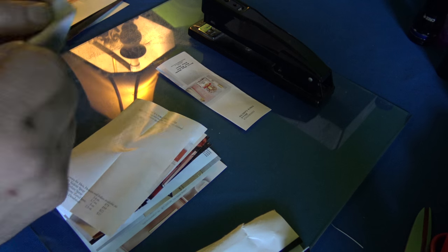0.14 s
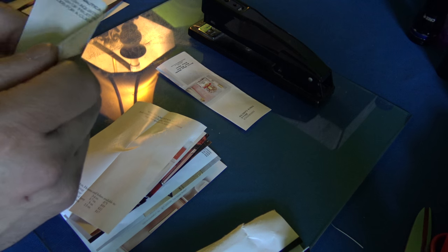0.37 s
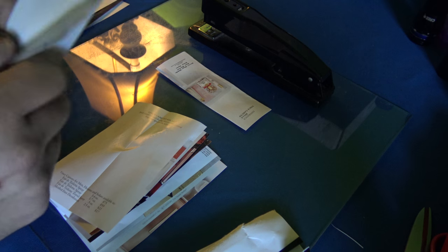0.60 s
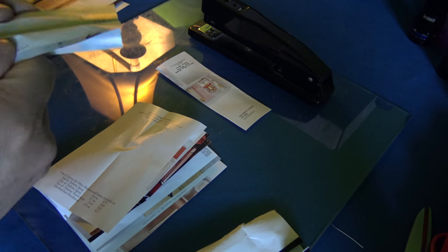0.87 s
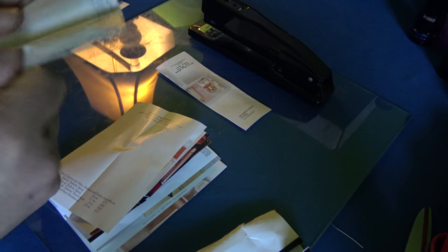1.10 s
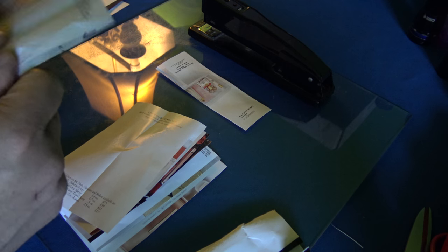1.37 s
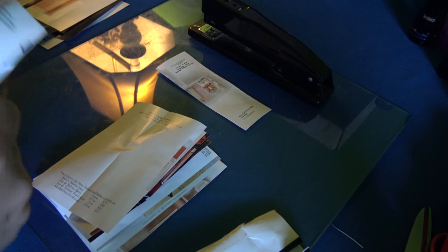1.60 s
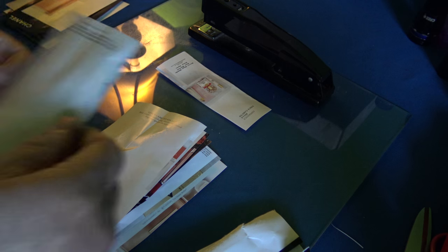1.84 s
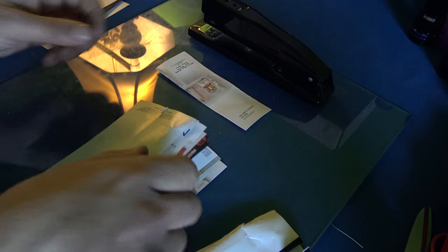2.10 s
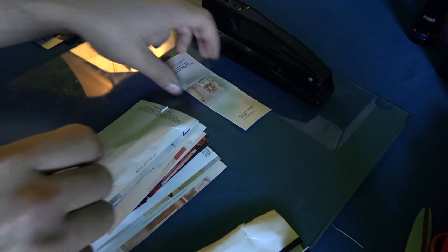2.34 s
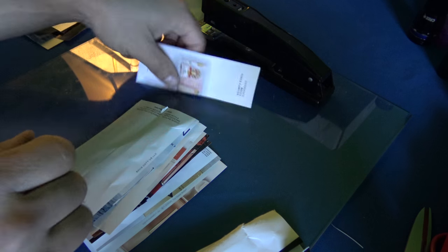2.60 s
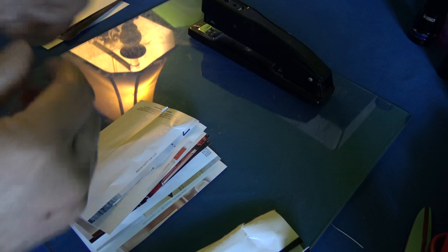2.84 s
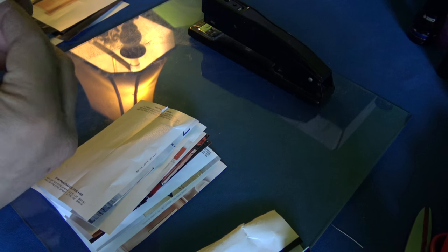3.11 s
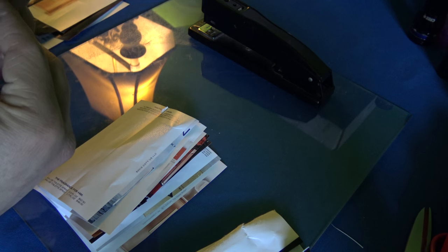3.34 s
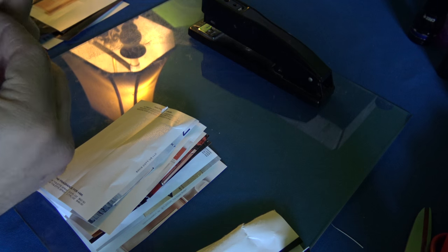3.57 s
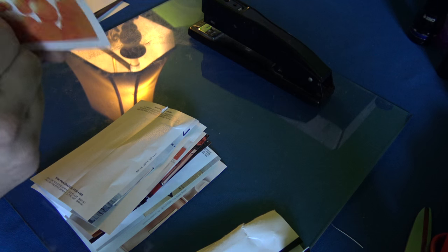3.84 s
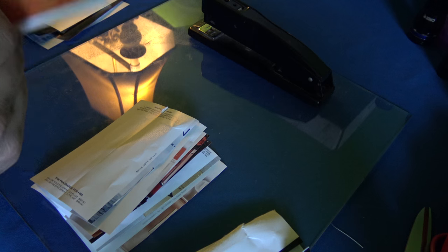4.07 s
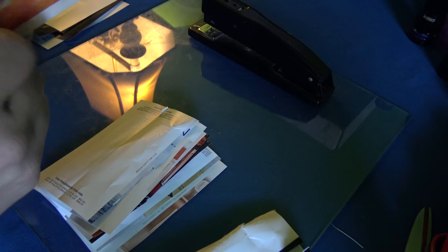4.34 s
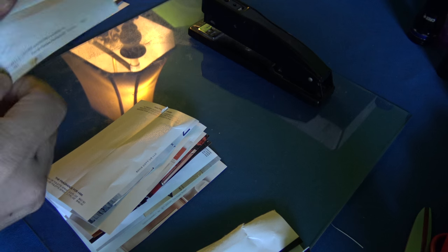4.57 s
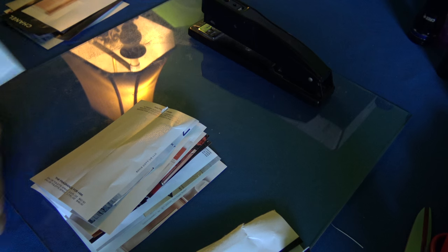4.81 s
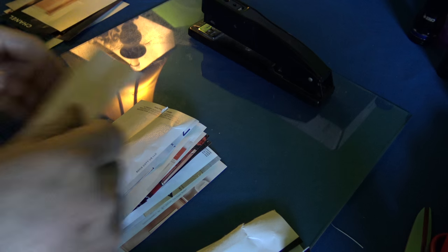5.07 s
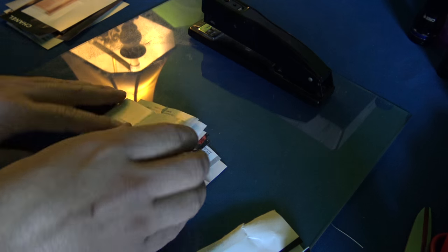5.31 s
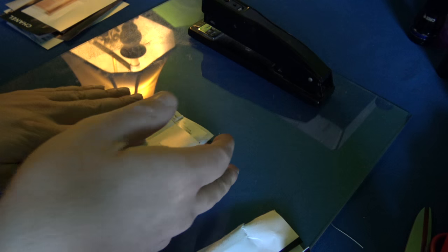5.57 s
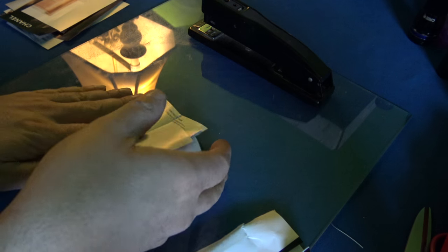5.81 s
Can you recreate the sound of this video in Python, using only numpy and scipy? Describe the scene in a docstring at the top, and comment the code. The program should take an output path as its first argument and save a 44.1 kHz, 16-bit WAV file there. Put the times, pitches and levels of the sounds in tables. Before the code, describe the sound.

Close, dry paper rustling and sharp crackling snaps in bursts, with quieter pauses, faint desk thumps and a low steady room drone.

```python
"""Paper rustles in dense crackles and snaps, an edge squeaks and fingers thump a desk top.
Hands crumple, fold and stack small paper strips close to two microphone ports.
Crackles and snaps are filtered noise bursts, squeaks are fuzzy gliding tones, thumps are ringing desk modes.
A small room answers the paper, a low drone fills the pauses, and the loudest snaps stand above the rustle."""
import sys
import numpy as np
from scipy import signal
from scipy.fft import rfft, irfft, next_fast_len
from scipy.io import wavfile
from scipy.ndimage import uniform_filter1d

SR = 44100
rng = np.random.default_rng(int(sys.argv[2]) if len(sys.argv) > 2 else 0)


def undo_db(level):
    """Turn decibels back into plain size, where 20 dB means ten times bigger."""
    steps = np.asarray(level, float) / 20
    return 10 ** steps


def generate_wav(sig):
    """Save sig (samples, or channels by samples) to the path in sys.argv[1] as 16-bit PCM at SR."""
    pcm = np.round(np.clip(np.atleast_2d(sig).T, -1, 1) * 32767).astype(np.int16)
    wavfile.write(sys.argv[1], SR, pcm)


N = 261513  # length in samples

# Centres of the octave-wide bands that build up the paper sounds: one column (frequency [Hz])
BAND_CENTRES_HZ = np.array([280, 560, 1100, 2100, 4000, 8000, 13000])


def unit(x):
    """Scale to rms 1."""
    return x / np.sqrt(np.mean(x ** 2, axis=-1, keepdims=True) + 1e-20)


def along(points, hz, column=1):
    """Read a column of a table between its frequency points, on a log axis."""
    table = np.transpose(points)
    return np.interp(np.log(hz + 1), np.log(table[0] + 1), table[column])


def filtered(x, response):
    """Shape the spectrum of x by a response that depends on frequency."""
    m = next_fast_len(N + 8192)
    spectrum = rfft(x, m)
    return irfft(spectrum * response(np.fft.rfftfreq(m, 1 / SR)), m)[..., :N]


def patchy(patchy_db):
    """White noise whose colour drifts in patches of time and frequency."""
    z = signal.stft(rng.standard_normal(N), nperseg=256)[2]
    field = uniform_filter1d(rng.standard_normal(z.shape), size=4, axis=0)
    field = uniform_filter1d(field, size=6, axis=1)
    coloured = z * undo_db(patchy_db * field / field.std())
    return unit(signal.istft(coloured, nperseg=256)[1][:N])


def fade(hz, t60, length=2048):
    """A sudden start dying away, slower in low octaves; t60 (seconds to fall 60 dB) holds at 3 kHz."""
    seconds = np.arange(length) / SR
    return undo_db(-60 * seconds / (t60 * (3000 / hz) ** 0.09))


def octave(x, hz):
    """Keep one octave of x around hz, using only its past."""
    edges = [hz / np.sqrt(2), min(hz * np.sqrt(2), SR / 2 - 100)]
    return signal.sosfilt(signal.butter(3, edges, "band", fs=SR, output="sos"), x)


def shares(tilt_db, bend_db):
    """How the energy divides over the octaves: big folds speak low, crease tips high."""
    octaves_up = np.log2(BAND_CENTRES_HZ / 3000)[:, None]
    gains = undo_db(tilt_db * octaves_up - bend_db * octaves_up ** 2)
    return gains / np.linalg.norm(gains, axis=0)


def drone(unlike_db=-14):
    """Steady rumble lifted at the room's low resonances, and hiss, nearly alike at both microphones."""
    # room resonances: (frequency [Hz], half width [Hz], strength of the added peak [dB])
    resonances = [(61.6, 1.7, 12.5), (142, 18, 2.5), (273, 27, 0.5),]
    # colour of the drone: (frequency [Hz], relative level [dB])
    drone_colour = [(25, -13.5), (45, -5.5), (95, -5), (430, -4), (520, -9.5), (2000, -13), (3000, -27),
                    (12000, -28.5), (16000, -19)]

    def response(hz):
        lift = 1 + sum(undo_db(db) / (1 + ((hz - centre) / width) ** 2) for centre, width, db in resonances)
        return undo_db(along(drone_colour, hz) - 32.5) * lift

    shared = patchy(patchy_db=1.56)
    unlike = undo_db(unlike_db) * patchy(patchy_db=0.5)
    noise = filtered(np.array([shared, unlike]), response)
    return [[1, 1.0], [1, 0.05]] @ noise  # the unlike part is mostly at the left


def room(x, desk_s=.0026, desk_db=-8, tail_db=-11):
    """Direct sound, a bounce off the desk, stronger at the left, then a tail; both change as the hands move."""
    # dying away of the tail: (frequency [Hz], t60 [s], share unlike left and right [ratio])
    tail_table = [(300, 0.21, 0.32), (2540, 0.25, 0.0081), (11400, 0.013, 0.17)]
    out = np.array([x, x])
    hop = SR // 5  # each fifth of a second gets its own answer
    for start in range(0, N, hop):
        hz, t, z = signal.stft(rng.standard_normal((2, SR // 3)), SR, nperseg=256)
        z[1] *= along(tail_table, hz, column=2)[:, None]
        decay = undo_db(-60 * t / along(tail_table, hz)[:, None])
        alike, unlike = signal.istft(z * decay, SR, nperseg=256)[1]
        tail = undo_db(tail_db) * np.array([alike + unlike, alike - unlike]) / np.linalg.norm(alike)
        answer = np.pad(tail, ((0, 0), (330, 0)))  # the tail waits 330 samples
        # the bounce arrives up to two samples apart at the two ports
        bounce_at = round(desk_s * SR * (.5 + rng.random())) + rng.integers(3, size=2)
        answer[[0, 1], bounce_at] = undo_db(desk_db + np.array([2.5, -2.5]))
        wet = signal.fftconvolve(x[None, start:start + hop], answer, axes=1)[:, :N - start]
        out[:, start:start + wet.shape[1]] += wet
    return out


def thumps():
    """A fingertip sets the desk top ringing; a soft touch wakes only its low modes, a nail knocks."""
    # fingers on the desk: (time [s], strength [dB], dullness [dB per octave], knock level [dB])
    touches = [(2.382, -34.5, 1, -33), (2.392, -34, 0.5, -50), (3.804, -45.5, -0.5, -39),
               (5.42, -33.5, 12.5, -28), (5.52, -36, 17, -37), (5.832, -46, 16, -49)]
    # ringing modes of the desk top: (frequency [Hz], relative level [dB], t60 before hand damping [s])
    desk_modes = [(124, 7, 0.5), (173, 6.5, 0.4), (216, 10, 0.14), (257, 10, 0.106), (371.5, 15.5, 0.086)]
    # the knock's pitch sags as the finger settles
    knock_hz, knock_t60_s, knock_sag_hz_per_s = 779, 0.068, 4400
    out = np.zeros(N + SR)
    t = np.arange(SR // 2) / SR
    onset = 1 - np.exp(-t / 0.0042)  # soft start
    knock_tone = np.sin(2 * np.pi * (knock_hz - knock_sag_hz_per_s * t / 2) * t)
    for s, db, dull_db, knock_db in touches:
        damp_db_per_s = 25 * max(6.5 - dull_db, 0)  # a firm hand stays down and damps the ring
        ring = np.zeros(len(t))
        for hz, level, t60 in desk_modes:
            mode_db = level - dull_db * np.log2(hz / 120) - 60 * t / t60 - damp_db_per_s * t
            ring += undo_db(mode_db) * np.sin(2 * np.pi * hz * t)
        knock = undo_db(knock_db - 60 * t / knock_t60_s) * knock_tone
        out[round(s * SR):][:len(t)] += (undo_db(db) * ring + knock) * onset
    return out[:N]


def squeaks(octave_db_per_fuzz=-25):
    """Stick-slip of a paper edge: a fuzzy gliding tone, fading as it slows; cleaner ones carry their octave."""
    # an edge slides and sings:
    # (time [s], length [s], start pitch [Hz], end pitch [Hz], level [dB], fuzz [share of the pitch])
    slides = [(2.782, .11, 4350, 4070, -48, 0.23), (3.365, 0.067, 3040, 2880, -49.5, 0.086),
              (4.812, 0.0348, 1330, 912, -29, 0.39), (5.818, 0.18, 1948, 1640, -29.5, 0.37)]
    out = np.zeros(N + SR)
    for s, length_s, start_hz, end_hz, db, fuzz in slides:
        u = np.linspace(0, 1, round(length_s * SR))
        turn = 2 * np.pi * np.cumsum(start_hz + (end_hz - start_hz) * u) / SR
        # slow random wobble of size and phase makes the tone fuzzy
        span = round(SR / (2 * fuzz * start_hz))
        wobble = uniform_filter1d(rng.standard_normal((2, 2, SR // 2)), span)
        re, im = uniform_filter1d(wobble, span)[..., :len(u)]
        tone, overtone = unit(re * np.cos([turn, 2 * turn]) + im * np.sin([turn, 2 * turn]))
        swell = np.sin(np.pi * np.sqrt(u))  # quick rise, slow fall
        voice = tone + undo_db(octave_db_per_fuzz * fuzz) * overtone
        out[round(s * SR):][:len(u)] += undo_db(db) * swell * voice
    return out[:N]


def snaps():
    """Each snap is one kick and a short shiver, coloured by the part of the paper that flips."""
    # creases flipping: (time [s], rms over the shiver [dB], centre [octaves above 3 kHz])
    flips = [(0.01, -16, 2), (0.067, -18, 2.5), (0.145, -12, 2), (0.352, -21.5, 0.8), (0.39, -14, 2.4),
             (0.656, -19.5, 0.3), (0.685, -17.5, 2), (0.717, -15.5, 2.5), (0.974, -21.5, 1),
             (1.1171, -17, 2.4), (1.286, -24, -1), (1.321, -32.5, 2.5), (1.414, -28.5, 3),
             (1.475, -24.5, -1), (1.491, -23, -1), (1.533, -21, -0.54), (1.554, -29, -2),
             (1.693, -33.5, 2.5), (1.721, -27.5, -0.84), (1.811, -23, -1.11), (2.009, -46, .9),
             (2.033, -50, 1.6), (2.058, -32.5, -0.06), (2.078, -52, 2.2), (2.099, -30, 1.78),
             (2.381, -24, 2.7), (2.437, -34, 2.3), (2.445, -34.5, 1.4), (2.467, -38, 1),
             (2.527, -38.5, 2.5), (2.553, -39.5, 1.7), (2.624, -34, 1.6), (2.644, -36.5, -0.96),
             (2.658, -48, 3), (2.692, -40, 2.5), (3.044, -39.5, -1.5), (3.367, -27, 1.2), (3.55, -39, -1.7),
             (3.808, -23.5, 0), (3.82, -17, 1.83), (3.94, -19.5, -.2), (4.065, -13.5, 2),
             (4.108, -20, 1.35), (4.121, -16, 2.45), (4.169, -18, 2.5), (4.203, -16, 1.75),
             (4.298, -16, 2.5), (4.418, -36.5, 2.5), (4.472, -17.5, 2.5), (4.569, -18, 1),
             (4.624, -31, 1.5), (4.729, -35, 2.1), (4.771, -28, -.5), (4.855, -15, 2.5), (4.96, -23, -.9),
             (4.99, -30.5, -0.45), (5.215, -36, -0.4), (5.252, -37.5, 1.6), (5.421, -27.5, 2.5),
             (5.565, -27.5, -0.5), (5.578, -33, 0), (5.595, -27, 0.05), (5.791, -27.5, 1.2),
             (5.807, -18.5, 1.5), (5.814, -18, -.5), (5.843, -20.5, -0.5)]
    shiver_s = .008  # t60 at 3 kHz
    # snaps centred higher spread wider, until flat at flat_octave
    flat_octave, bend_db_per_octave, most_bend_db = 2.784, 2.5, 5.5
    out = np.zeros(N + 2048)
    for s, db, centre in flips:
        bend_db = np.clip(bend_db_per_octave * (flat_octave - centre), 0, most_bend_db)
        tilt_db = 2 * bend_db * centre  # puts the peak at the centre
        shiver = rng.standard_normal(2048)
        shiver[0] = 5.5 * np.sign(shiver[0])  # the kick
        for hz, share in zip(BAND_CENTRES_HZ, shares(tilt_db, bend_db)):
            burst = octave(fade(hz, t60=shiver_s) * shiver, hz)
            burst = burst / np.linalg.norm(burst) * np.sqrt(shiver_s * SR)
            out[round(s * SR):][:2048] += undo_db(db) * share * burst
    return out[:N]


def handling():
    """Rustle level, tilt and bend: every grip swells, holds and lets go; the strongest sets the colour."""
    # each grip of the fingers:
    # (time of full pressure [s], swell [s], hold [s], rustle level [dB], tilt [dB per octave])
    grips = [(0.038, 0.004, 0.085, -24, 8.5), (0.151, 0.15, 0.063, -20.5, 4.5),
             (0.407, 0.13, 0.012, -32, 4.5), (0.599, 0.22, 0.016, -33, 4), (0.795, 0.19, 0.052, -20.5, 4),
             (0.988, 0.054, 0.012, -33.5, 1.5), (1.074, 0.033, 0.015, -28.5, 3),
             (1.125, 0.011, 0.019, -19.5, 3.5), (1.312, 0.046, 0.014, -31.5, 3),
             (1.456, 0.096, 0.033, -30.5, -0.5), (1.621, 0.1, 0.033, -39.5, -0.5),
             (1.701, 0.24, 0.076, -38.5, 1.5), (2.07, 0.11, 0.033, -42.5, 2.5),
             (2.375, 0.009, 0.12, -47, 2.5), (2.602, 0.42, 0.052, -44.5, 2), (2.781, 0.12, 0.094, -48, 1.5),
             (3.044, 0.01, 0.05, -40, 1), (3.361, 0.095, 0.017, -44.5, 3),
             (3.551, 0.022, 0.035, -37.5, 2.5), (3.626, 0.11, 0.021, -37, 7),
             (3.823, 0.09, 0.014, -26, 5.5), (4.065, 0.0071, 0.0053, -26.5, 3.5),
             (4.148, 0.22, 0.0793, -23, 5), (4.471, 0.15, 0.014, -26.5, 6.5),
             (4.484, 0.05, 0.047, -22, -0.2), (4.671, 0.027, 0.018, -34.5, 9),
             (4.764, 0.014, 0.015, -32.5, 0), (4.815, 0.016, 0.018, -32, 0),
             (4.868, 0.034, 0.053, -31, 2.5), (5.165, 0.018, 0.11, -44.5, 0.5),
             (5.586, 0.19, 0.054, -36, 3), (5.81, 0.13, .15, -38, 3.5)]
    swell_db, release_db_per_s = 28, 135  # climb over one swell time; fall as the fingers let go
    stop_db, stop_s = 4, 0.004  # a light grip quickly drops this much more when it stops
    grip_bend_db = 1  # dB per octave squared
    rest_db, rest_tilt_db, rest_bend_db = -64, 20, 22  # paper merely held
    s, swell_s, hold_s, db, tilt_db = np.transpose(grips)[:, :, None]
    steps = np.arange(0, N + 64, 64)
    late = steps / SR - s
    since_hold = np.maximum(late - hold_s, 0)
    lost_db = swell_db * np.maximum(-late, 0) / swell_s + release_db_per_s * since_hold
    lost_db = lost_db + stop_db * (db < -28) * (1 - np.exp(-since_hold / stop_s))
    power, rest = undo_db(2 * (db - lost_db)), undo_db(2 * rest_db)
    total = power.sum(axis=0) + rest

    def blend(gripped, held):
        return ((power * gripped).sum(axis=0) + rest * held) / total

    controls = 10 * np.log10(total), blend(tilt_db, rest_tilt_db), blend(grip_bend_db, rest_bend_db)
    return [np.interp(np.arange(N), steps, c) for c in controls]


def rustle(calm_db=120):
    """Small creases pop at random over the hiss of sliding sheets: most in a hard grip, less as it relaxes."""
    pops_per_s, spread_db, own_db = 380, 1.7, 2.5  # own_db: size differences from octave to octave
    slide, kick = .52, 4  # strength of the hiss and of each pop's first kick
    effort_db, tilt_db, bend_db = handling()
    effort_db_per_s = np.gradient(effort_db) * SR
    pressing = np.clip(1.0 + effort_db_per_s / (2 * calm_db), .3, 1)  # weaker crackle while letting go
    pressing = pressing * np.clip((effort_db + 48) / 26, .42, 1)  # and in a light grip
    luck = rng.random((3, N))
    pops = (luck[0] < pops_per_s / SR) * undo_db(-spread_db * np.log(luck[1] + .1))  # a few pops are bigger
    out = np.zeros(N)
    for hz, share in zip(BAND_CENTRES_HZ, shares(tilt_db, bend_db)):
        sizes = pops * undo_db(own_db * rng.standard_normal(N))
        shake = np.sqrt(np.abs(signal.fftconvolve(sizes ** 2, fade(hz, t60=.007) ** 2)[:N]))
        crackle = shake * patchy(patchy_db=4.5)
        crackle = crackle + kick * sizes * np.sign(luck[2] - .5)  # each pop opens with one kick
        hiss = slide * patchy(patchy_db=3)
        out += share * unit(octave(hiss + pressing * unit(crackle), hz))
    return out * undo_db(effort_db)


def scene():
    """Paper in the room, desk thumps a little louder at the left than at the right, over the drone."""
    paper = room(rustle() + snaps() + squeaks())
    return paper + thumps() * undo_db(0) * np.array(undo_db([[.6], [-.6]])) + drone()


def low_pass(x):
    """Removes everything above the highest recorded frequency."""
    return signal.sosfilt(signal.butter(12, 16990, fs=SR, output="sos"), x)


def record(dry, knee_db=-24, squeeze=0.21):
    """Two close ports lean left; gain control ducks under loud rustle; peaks are kept within full scale."""
    # colour of both ports: (frequency [Hz], level [dB])
    port_colour = [(900, 2), (1500, -2), (2100, 2), (2900, 0), (10000, 2), (13000, -3.5), (15800, -12)]
    # lean to the left: (frequency [Hz], left over right [dB])
    left_lean = [(60, -1.5), (300, 1), (600, 3.5), (2400, -0.5), (12000, 0.5)]
    top_hz = 15800  # the band ends here

    def ports(hz):
        gain = undo_db(along(left_lean, hz) * [[.5], [-.5]] + along(port_colour, hz))
        turn = np.exp(1j * hz * np.array([[8e-6], [-8e-6]]))  # the left is a touch earlier
        return gain * turn * (hz < top_hz)

    x = filtered(dry, ports)
    power = uniform_filter1d(np.mean(x ** 2, 0), size=SR // 12)
    loud_db = 10 * np.log10(np.abs(power) + 1e-9)
    x = x * undo_db(-squeeze * np.maximum(loud_db - knee_db, 0))
    mix = np.clip(x, -.99, .99)
    return low_pass(mix)


dry = scene()
out = record(dry)
generate_wav(out)
```